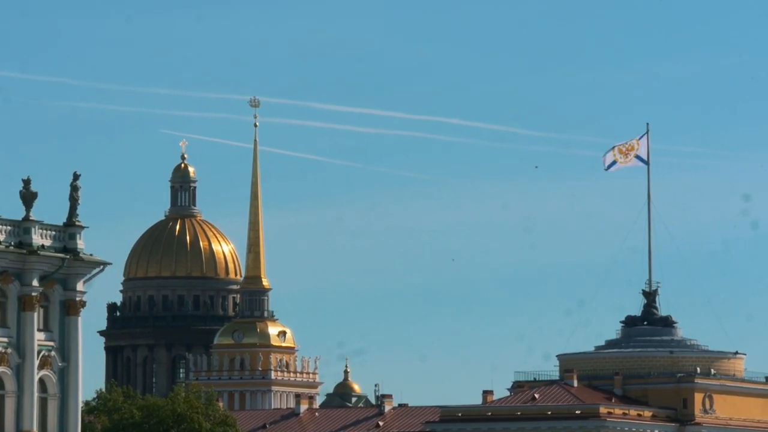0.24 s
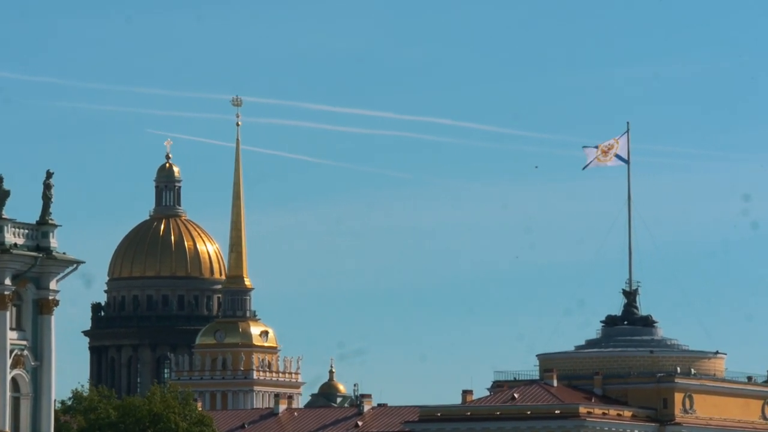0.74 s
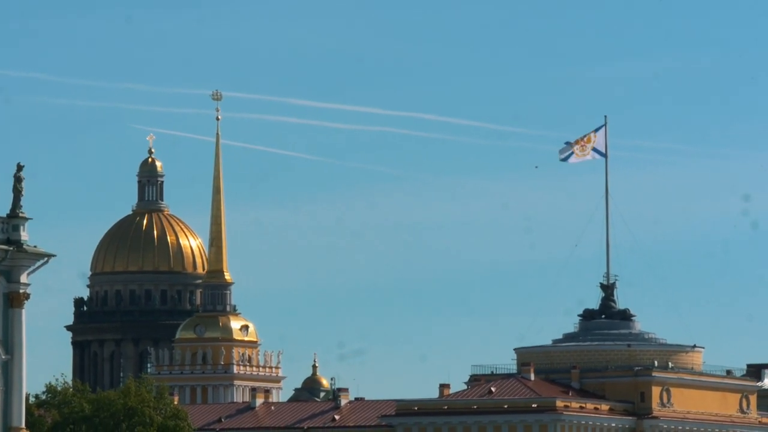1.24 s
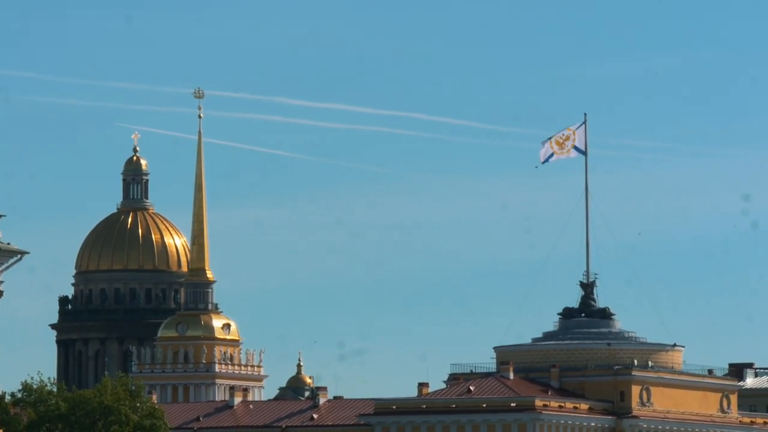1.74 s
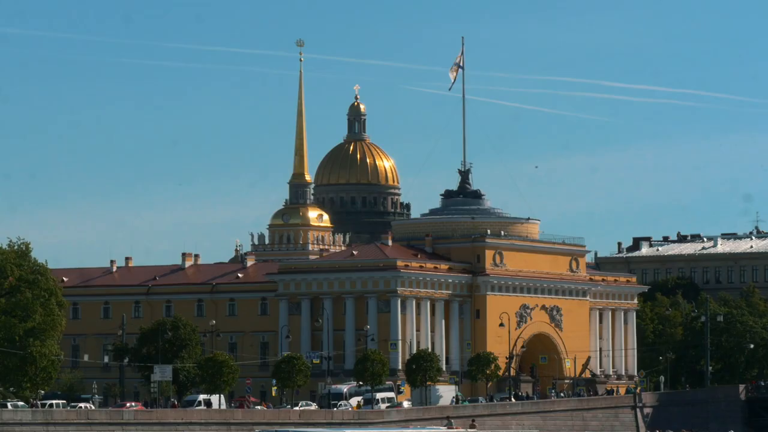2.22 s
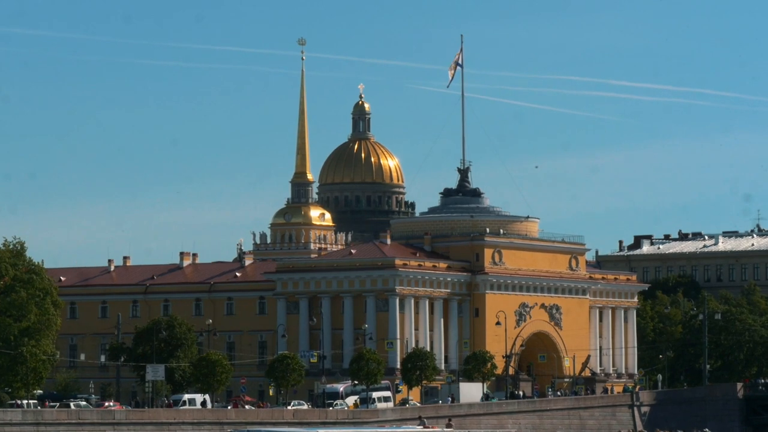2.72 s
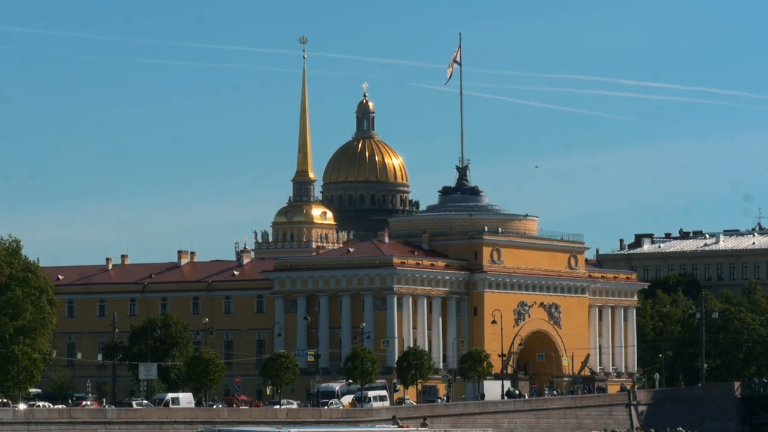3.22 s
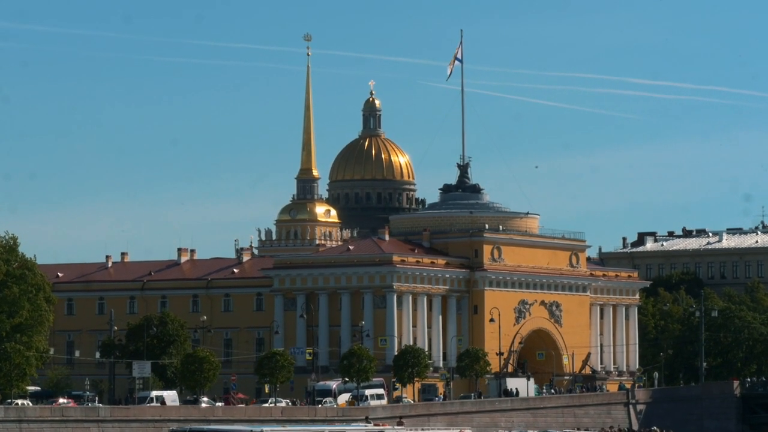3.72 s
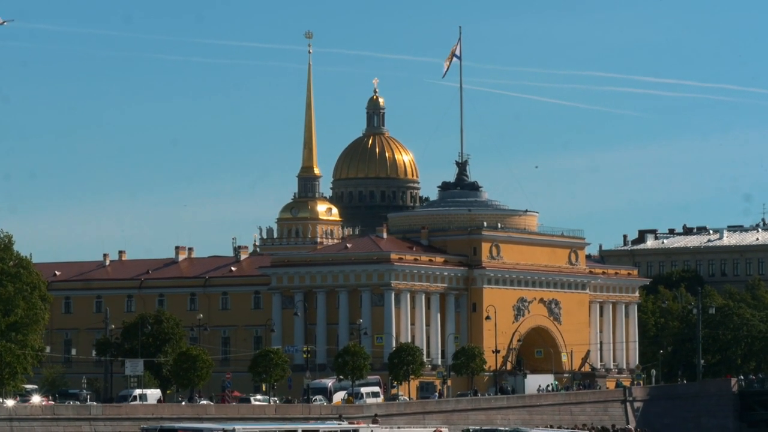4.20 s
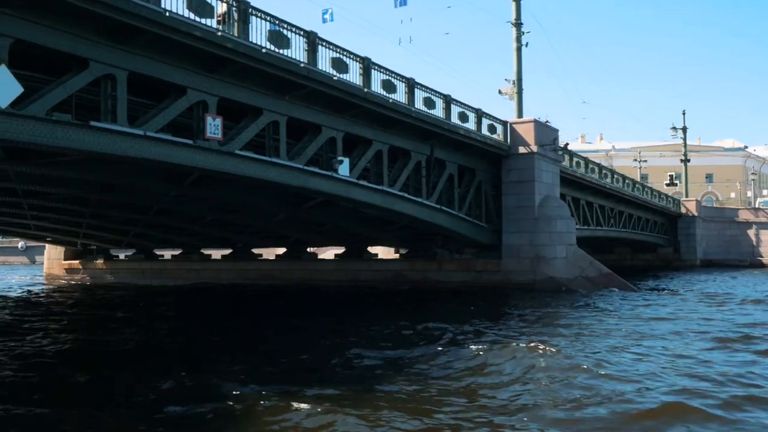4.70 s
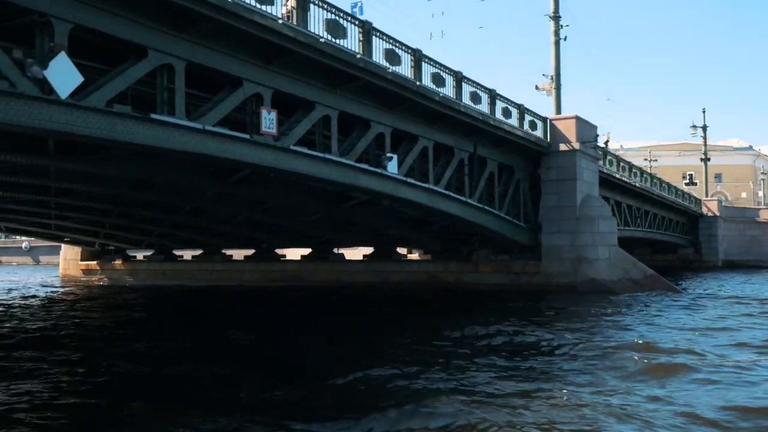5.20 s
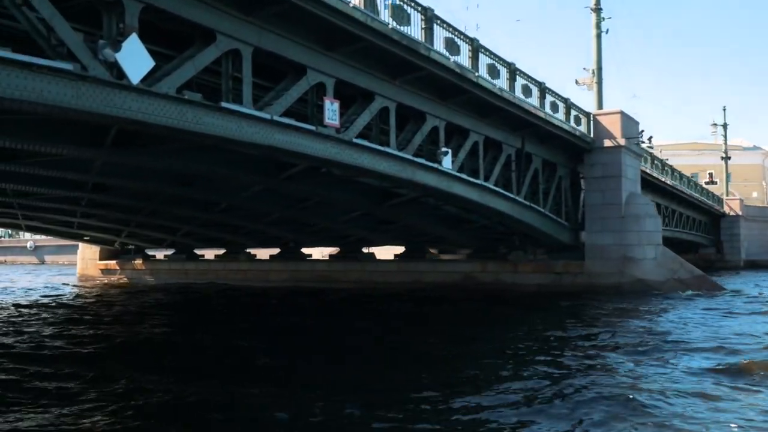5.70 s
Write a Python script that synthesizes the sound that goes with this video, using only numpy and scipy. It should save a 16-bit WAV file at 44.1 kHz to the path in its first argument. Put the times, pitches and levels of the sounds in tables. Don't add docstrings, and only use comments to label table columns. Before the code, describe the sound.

Deep diesel drone of a river tour boat's two engines, slowly beating faster, with hull hum, exhaust roar and water rushing along the side.

```python
import sys
import numpy as np
from scipy import signal
from scipy.fft import rfft, irfft, next_fast_len
from scipy.io import wavfile
from scipy.ndimage import uniform_filter1d, map_coordinates

SR = 44100
rng = np.random.default_rng(int(sys.argv[2]) if len(sys.argv) > 2 else 0)


def nominal_scale(level):
    x = np.asarray(level, float) / 20
    return 10 ** x


def to_wav(sig):
    pcm = np.clip(np.atleast_2d(sig), -1, 1) * 32767
    pcm = np.round(pcm).astype(np.int16)
    wavfile.write(sys.argv[1], SR, pcm.T)


N = 262395
TIME = np.arange(N) / SR

# time_s, share_0_to_1
WALL_NEARNESS = [(0, 1), (.2, 0.42), (.4, 0), (.85, 0.07), (1.2, 0.3), (1.6, 0.1), (2.4, 0.23), (3.1, 0.03),
                 (4.15, 0), (4.7, 0.73), (5.1, 0.76), (5.45, 1), (5.68, 0.6), (5.95, 0.03)]
# time_s, level_db
FACING = [
    (0, 0.5),
    (.5, -2.5),
    (1.3, 1.5),
    (2, 0.5),
    (3.3, 1.5),
    (4.1, 0),
    (4.7, .5),
    (5.4, -.5),
    (5.95, -3),
]
# pitch_hz, likeness_0_to_1
PORT_LIKENESS = [(30, 0.68), (130, 0.67), (300, 1), (640, 0.22), (1400, 0.26), (3100, 0.38), (7000, 0.18),
                 (15000, 0.066)]
# pitch_hz, lead_rad
PORT_LEAD = [(30, 3.1), (100, 1.84), (250, 1.4), (400, 1.75), (800, 0.13), (15000, .2)]
# pitch_hz, level_db
RIGHT_PORT = [(11000, 0), (12500, -1.8), (14000, -2.2)]
# pitch_hz, level_db_per_hz
HISS_COLOUR = [(3000, -17), (8000, 3), (13000, -7), (14600, -10), (15050, -3), (15400, 8)]

# pitch_hz, left_db, right_db
PUMP = (52.5, -47, -48)

# time_s, level_db
WATER_FLOW = [(0, -48.5), (.41, -51.5), (.71, -50), (1, -51), (2.7, -51.5), (3.2, -51.5), (4.06, -52.5),
              (4.7, -46.5), (5.07, -45.5), (5.5, -46), (5.95, -49.5)]
# time_s, width_s, level_db
SPLASH = [
    (2.96, .065, 3),
]
# time_s, rise_s, fall_s, level_db
FOAM = [
    (2.37, .04, .03, -58),
    (2.99, 0.13, .04, -55),
]
# pitch_hz, level_db_per_hz
FOAM_COLOUR = [(1000, -40), (1800, -3), (3000, 1), (5500, -5), (7500, -16), (11000, -45)]
WASH_COLOUR = [(500, -12), (1000, 5), (1500, 0), (2500, -6), (4000, -11.5), (6000, -18), (9000, -40)]
SPRAY_COLOUR = [(3000, -6), (5000, 3), (7500, 4), (10000, -1.5), (12500, -6.5), (13500, -24), (15500, -22)]
CALM_DB = -51.3

# pitch_hz, level_db_per_hz
RUMBLE_COLOUR = [(10, -30), (25, -19.5), (45, -10), (75, -8.5), (100, -1), (135, -6.5), (155, -2),
                 (185, -3.5), (230, -5), (320, -2), (400, -8), (520, -49.5)]
INTAKE_COLOUR = [(600, -49), (720, -6.5), (820, 1.5), (950, -1), (1100, -14.5), (1700, -18.5), (3000, -54)]
EXHAUST_COLOUR = [(200, -59), (300, -3), (480, 4.5), (600, -0.5), (700, -1.5), (800, -6), (1000, -43)]

# multiple_of_cycle, left_db, right_db, left_lead_rad, wall_adds_db
WHINE_ORDERS = [(78, -69, -62.5, .2, 0)]
SWELLING_ORDERS = [(22, 0, 0, 1, 0), (24, -9, -9, 1.2, 0)]
SECOND_ORDERS = [(7, -50, -57, 2.4, 1), (10, -51, -56, 1.9, 2), (12, -50, -47.5, 1.9, 2),
                 (16, -48, -45, 1.9, 3), (18, -51, -46, 1.6, 3), (20, -47, -43, 1.9, 4),
                 (22, -57, -48, .5, 2), (44, -61, -54, .1, 3)]
FIRST_ORDERS = [(2, -61, -59.5, 2.96, 10), (4, -53, -55, 3, 8), (5, -59, -66, 3.3, 13),
                (7, -48, -46.5, 1.8, 1.5), (9.5, -54, -55, 2, 1), (12, -56, -52, 2.7, 7),
                (14, -46.5, -44, 2.3, 7), (16, -42.5, -47, 1.68, 5), (17, -53.5, -53.5, 1.46, 12),
                (18, -40, -44.5, 1.52, 0), (19, -60, -52, 2.7, -9), (21, -53, -58, 2, -14),
                (23, -67, -48.5, 0.75, 6), (26, -57, -49, 0.51, 7), (27, -60, -49, 0.69, 8),
                (28, -61, -52, 0.52, 7), (29, -57, -56, 0.29, 11), (30, -58, -48.5, 0.11, 11),
                (31, -59, -52, 0.72, 11), (32, -56, -53, 1.9, 6), (34, -58, -52, .3, 6),
                (38, -59, -54, 0.36, 10), (40, -62, -54, .6, 7), (42, -62, -51, .5, 8),
                (43, -66, -53, 1, 7), (44, -63, -51.5, 2.5, 7), (45, -66, -54, 1.5, 8)]
# time_s, width_s, level_db
DECK_SWELLS = [
    (.1, 0.068, -36),
    (1.7, 0.55, -35.5),
    (3, 0.16, -55),
    (3.9, 0.76, -40),
    (5.25, 0.38, -33.5),
]
# multiple_of_cycle, time_s, width_s, left_db, right_db, left_lead_rad
PLATES = [(26, 0.05, .3, -45, -38, .5), (30, .1, .15, -48, -40, .2), (38, .15, .2, -58, -45, .4),
          (42, .85, .12, -57, -47, .5), (42, 1.18, .08, -50, -38.5, .5), (41, 1.17, .05, -52, -43, .5),
          (42, 1.55, .12, -54, -45, .5), (32, 2.25, .15, -55, -45, 1), (24, 3, .15, -46, -43, 1.2),
          (24, 3.3, .12, -46, -44, 1.2), (30, 4.5, .15, -52, -44, .2), (16, 5.32, .15, -38, -32.5, 1),
          (16, 4.82, .07, -46, -40, 1.2), (16, .02, .05, -47, -41, 1.2), (16, .35, .05, -48, -48, 1.5),
          (17, 4.4, .1, -44, -41, 1.4), (18, 5.4, .17, -39, -35, 1.3), (42, 5.25, .17, -49, -40, .5),
          (45, 5.25, .1, -50, -42, 1), (42, .03, .08, -50, -41, .5), (31, 5.45, .15, -43, -38, .6),
          (26, 5.75, .15, -53, -41, .5), (18, .9, .15, -44, -44, 1.5), (18, 1.5, .2, -45, -44, 1.5),
          (18, 4.35, .08, -43, -47, 1.5), (18, 4.85, .08, -46, -39, 1.4), (32, .05, .2, -44, -40, 1),
          (9.5, 2.07, .12, -49, -46, 2), (9.5, 2.72, .08, -47, -46, 2), (9.5, 3.13, .13, -49, -46, 2),
          (9.5, 5.68, .1, -46, -45, 2), (22, 3.05, .12, -45, -45, 1)]
SPREAD = 3 / 64

# time_s, level_db
HULL_LEVEL = [(0, -34.5), (.2, -29.5), (.55, -35), (1.05, -28), (1.4, -32), (2.1, -30), (2.6, -35),
              (3.1, -33), (4.05, -37), (4.35, -39), (4.75, -27.5), (5, -28), (5.35, -31.5), (5.6, -38),
              (5.95, -41)]
# time_s, width_s, depth_db
HULL_FADES = [(.35, 0.056, -21), (.47, .03, -1.5), (.6, 0.047, -4.5), (1.31, .015, -4), (1.83, .015, -6),
              (2.49, 0.014, -5), (2.61, .012, -4), (3.45, .012, -4), (3.7, 0.011, -3), (3.92, .012, -3),
              (4.18, 0.032, -22), (4.31, 0.033, -2), (5.24, 0.052, -5.5), (5.77, 0.02, -1)]
# time_s, width_s, left_minus_right_db
HULL_TURNS = [
    (.05, .1, -5),
    (3.7, .3, 3),
    (4.75, 0.22, -2),
    (5.35, .2, 3),
]

# time_s, four_stroke_cycles_per_s
SPEED = [(0, 16.255), (.7, 16.23), (1.3, 16.26), (2.1, 16.228), (2.5, 16.32), (3, 16.245), (4.5, 16.21),
         (4.9, 16.245), (5.95, 16.22)]
# time_s, firings_lost_per_s
SLIP = [
    (0, .42),
    (.9, 1.674),
    (2.5, 3.097),
    (3, 3.108),
    (4, 3.494),
    (5.2, 4.792),
    (5.95, 4.865),
]
# time_s, level_db, left_minus_right_db
SECOND_FIRING = [(.4, -30.8, 2.2), (.9, -30.2, 2.1), (1.65, -32.6, .4), (2.1, -31.4, 2.2),
                 (2.65, -29.4, 2.5), (3.4, -30.5, 2.7), (3.85, -31.6, .8), (4.2, -32.2, 1.2),
                 (4.6, -30.7, 1.8), (4.9, -31.6, 2), (5.22, -29.7, 3.4), (5.45, -32.7, 3.6),
                 (5.7, -31.5, 1.5), (5.9, -36.5, 1.2)]
# time_s, level_db, left_minus_right_db, left_lead_rad
FIRST_FIRING = [(0, -27.5, 4.5, 2.85), (.3, -27.9, 3, 2.72), (.7, -27.4, 2.3, 2.68),
                (1.15, -26.4, 2.9, 2.56), (1.9, -28.3, 2.2, 2.66), (2.45, -27, 2, 2.61),
                (3.2, -29, 1.8, 2.75), (3.8, -28.5, 1.1, 2.71), (4.1, -30.5, 1.2, 2.72),
                (4.38, -26.8, 7, 2.7), (4.53, -29.3, 4.3, 2.92), (4.72, -24.6, 6.8, 2.7),
                (4.88, -26.6, 10.3, 2.9), (5, -32, 12.2, 3.45), (5.12, -30, 10, 3), (5.5, -32.5, 9.4, 3),
                (5.62, -30.5, 8.8, 2.89), (5.8, -25.7, 2.4, 2.93)]
# time_s, width_s, depth_db, phase_swing_rad
ECHO_CANCEL = (5.27, .085, -6, 1.9)


def unit(x):
    return x / np.sqrt(np.mean(x ** 2) + 1e-20)


def along(points, hz):
    f, v = np.transpose(points)
    return np.interp(np.log(hz + 1), np.log(f + 1), v)


def curves(rows):
    s, *columns = np.transpose(rows)
    return [np.interp(TIME, s, column) for column in columns]


def bumps(rows):
    return sum(height * np.exp(-((TIME - s) / width) ** 2 / 2) for s, width, height in rows)


def wobble(rate):
    knots = rng.standard_normal(int(N * rate / SR) + 4)
    return map_coordinates(knots, [TIME * rate])


def rush(colour, patchy_db, pan_db):
    z = signal.stft(rng.standard_normal((2, N + 512)), nperseg=512)[2]
    patches = uniform_filter1d(rng.standard_normal(z.shape[1:]), size=6, axis=0)
    patches = uniform_filter1d(patches, size=12, axis=1)
    pair = signal.istft(z * nominal_scale(patchy_db * unit(patches)), nperseg=512)[1]
    m = next_fast_len(N + 8192)
    hz = np.fft.rfftfreq(m, 1 / SR)
    turn = np.arccos(np.clip(along(PORT_LIKENESS, hz), 0, 1)) / 2
    same, other = rfft(pair, m) * nominal_scale(along(colour, hz)) * [np.cos(turn), np.sin(turn)]
    lead = np.exp(.5j * along(PORT_LEAD, hz))
    both = irfft([(same + other) * lead, (same - other) / lead], m)[:, :N]
    both = both * nominal_scale([[pan_db / 2], [-pan_db / 2]])
    return both / np.std(both.mean(axis=0))


def tone(turns, left_db, right_db, lead):
    angle = 2 * np.pi * turns
    left = nominal_scale(left_db) * np.sin(angle + lead / 2)
    right = nominal_scale(right_db) * np.sin(angle - lead / 2)
    return np.sqrt(2) * np.array([left, right])


def wall_nearness():
    return curves(WALL_NEARNESS)[0]


def flow(splash):
    return curves(WATER_FLOW)[0] - CALM_DB + splash * bumps(SPLASH)


def pump():
    hz, left_db, right_db = PUMP
    waver_db = 3 * wobble(2.0)
    turns = hz * TIME + 0.054 * wobble(3.9)
    return tone(turns, left_db + waver_db, right_db + waver_db, 3.3)


def foam():
    swell = 0
    for s, rise, fall, db in FOAM:
        width = np.where(TIME < s, rise, fall)
        swell = swell + nominal_scale(db) * np.exp(-((TIME - s) / width) ** 2 / 2)
    return swell * nominal_scale(1.5 * wobble(40)) * rush(FOAM_COLOUR, patchy_db=2.2, pan_db=-1.0)


def spray(flutter):
    level_db = -61 + 1.43 * flow(0.45) - 0.5 * TIME + 0.75 * flutter
    return nominal_scale(level_db) * rush(SPRAY_COLOUR, patchy_db=0.6, pan_db=0.0)


def wash(flutter):
    level_db = CALM_DB + flow(0.49) + 3.5 + 0.15 * flutter
    return nominal_scale(level_db) * rush(WASH_COLOUR, patchy_db=0.47, pan_db=-1.0)


def water():
    flutter = wobble(11) + 0.44 * wobble(30)
    pan_db = 0.4 - 3.5 * wall_nearness()
    fine = spray(flutter) + foam()
    return wash(flutter) * nominal_scale([pan_db / 2, -pan_db / 2]) + fine * nominal_scale([pan_db / 3, -pan_db / 3])


def rumble():
    level_db = -39.5 + 0.96 * flow(0) + 0.98 * wobble(2.92)
    return nominal_scale(level_db) * rush(RUMBLE_COLOUR, patchy_db=1.0, pan_db=1.0)


def intake(wall, throb):
    level_db = -48 + 2.5 * wall + 0.31 * flow(0) + 0.03 * TIME + curves(FACING)[0]
    return nominal_scale(level_db + 0.27 * wobble(6.17)) * throb * rush(INTAKE_COLOUR, patchy_db=1.65, pan_db=-5.0)


def exhaust(wall, throb):
    level_db = -41 + 7.5 * wall + 0.45 * flow(0) - 0.33 * TIME - 0.52 * curves(FACING)[0]
    level_db = level_db + 0.42 * wobble(4.5) + 1.4 * wall * wobble(13)
    return nominal_scale(level_db) * throb * rush(EXHAUST_COLOUR, patchy_db=1.8, pan_db=-4.5)


def orders(table, cycles, wall, waver_db, jitter):
    out = np.zeros((2, N))
    for k, left_db, right_db, lead, wall_db in table:
        k = round(2 * k) / 2
        turns = k * cycles + SPREAD * k ** 2 + jitter * (k / 20) ** 2 * wobble(8)
        shared = wall_db * wall + waver_db * (1 + k / 50) * np.tanh(wobble(3.934))
        left = shared + 1.34 * wobble(7)
        right = shared + 0.98 * wobble(7)
        out += tone(turns, left_db + left, right_db + right, lead + 0.52 * wobble(3.17))
    return out


def plates(first, wall):
    out = np.zeros((2, N))
    for k, s, width, left_db, right_db, lead in PLATES:
        row = [(k, left_db, right_db, lead, 0)]
        out += bumps([(s, width, 1)]) * orders(row, first, wall, waver_db=2.2, jitter=0.05)
    return out


def shafts(first, second, wall):
    out = orders(FIRST_ORDERS, first, wall, waver_db=2.0, jitter=0.06)
    out += orders(SECOND_ORDERS, second, wall, waver_db=-1.0, jitter=0.069)
    swell = bumps([(s, width, nominal_scale(db)) for s, width, db in DECK_SWELLS])
    out += swell * orders(SWELLING_ORDERS, first, wall, waver_db=2.2, jitter=0.11)
    out += orders(WHINE_ORDERS, first, wall, waver_db=3.0, jitter=0.012)
    return out + plates(first, wall)


def hull(first):
    level_db = curves(HULL_LEVEL)[0] + bumps(HULL_FADES) + 0.76 * wobble(14)
    pan_db = bumps(HULL_TURNS)
    turns = 20 * first + SPREAD * 20 ** 2 + 0.018 * wobble(27)
    lead = 1.33 + 0.035 * wobble(4.2)
    return tone(turns, level_db + 3.5 + pan_db / 2, level_db + 3.0 - pan_db / 2, lead)


def firing_tones(first, second):
    first_db, pan_db, lead = curves(FIRST_FIRING)
    s, width, depth_db, swing = ECHO_CANCEL
    cancel = bumps([(s, width, 1)])
    first_db = first_db + depth_db * cancel
    lead = lead + swing * cancel
    out = tone(6 * first, first_db + pan_db / 2, first_db - pan_db / 2, lead)
    second_db, pan_db = curves(SECOND_FIRING)
    lead = 2.76 + .035 * TIME
    return out + tone(6 * second, second_db + pan_db / 2, second_db - pan_db / 2, lead)


def engines():
    first = np.cumsum(curves(SPEED)[0]) / SR
    lost = 1.797 + np.cumsum(curves(SLIP)[0]) / SR
    second = first - lost / 6
    wall = wall_nearness()
    throb = 1 + 0.12 * np.sin(2 * np.pi * first) + 0.08 * np.sin(4 * np.pi * first)
    noise = rumble() + intake(wall, throb) + exhaust(wall, throb)
    return noise + shafts(first, second, wall) + hull(first) + firing_tones(first, second)


def scene():
    return pump() + water() + engines()


def low_pass(x):
    return signal.sosfilt(signal.butter(12, 15990, fs=SR, output="sos"), x)


def record(dry):
    edge = SR // 10
    x = dry + nominal_scale(-73.5) * rush(HISS_COLOUR, patchy_db=3.5, pan_db=4.5)
    x = np.pad(x, [(0, 0), (edge, edge)], "reflect", reflect_type="odd")
    hz = np.fft.rfftfreq(x.shape[1], 1 / SR)
    port_gain = nominal_scale([0 * hz, along(RIGHT_PORT, hz)])
    x = irfft(rfft(x) * (hz < 15490) * port_gain, x.shape[1])
    return low_pass(x[:, edge:][:, :N])


dry = scene()
out = record(dry)
to_wav(out)
```